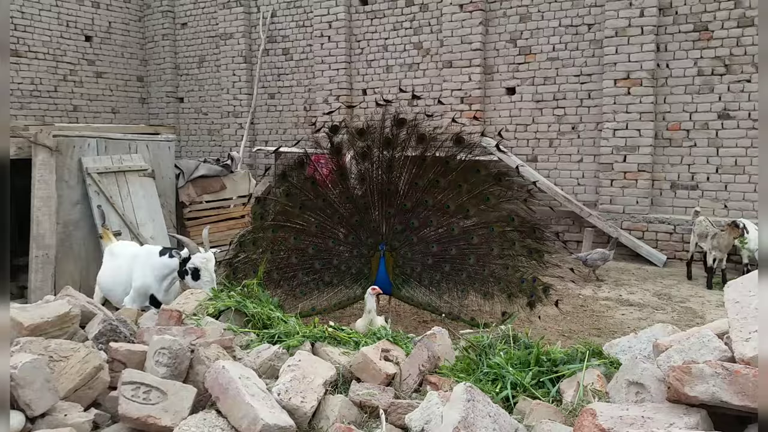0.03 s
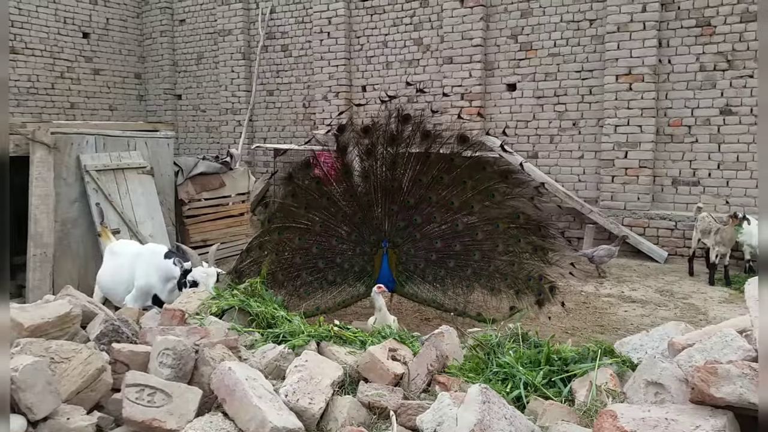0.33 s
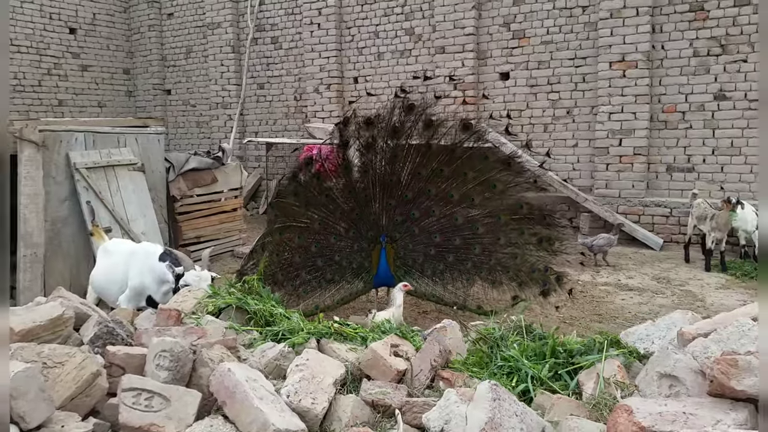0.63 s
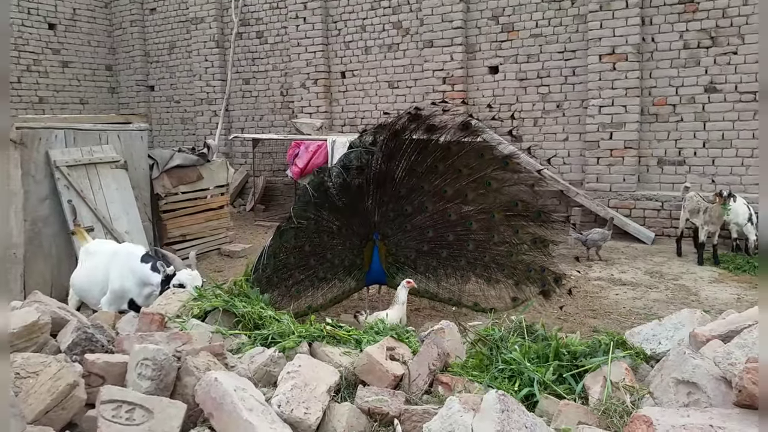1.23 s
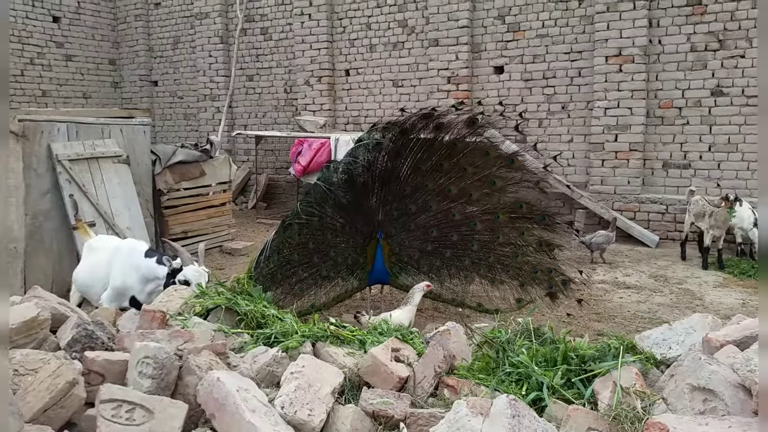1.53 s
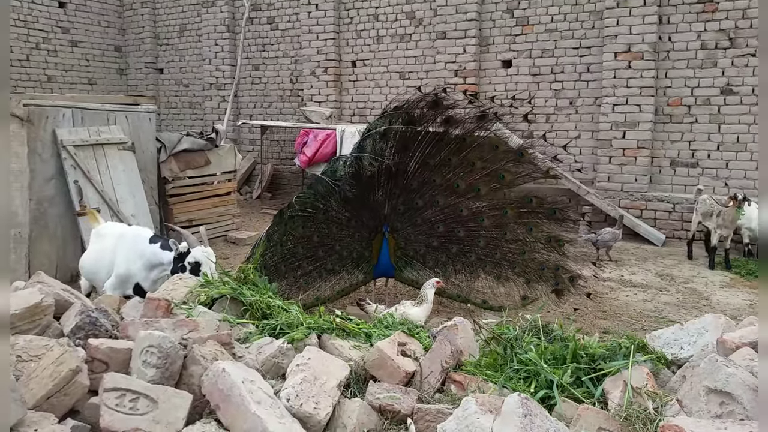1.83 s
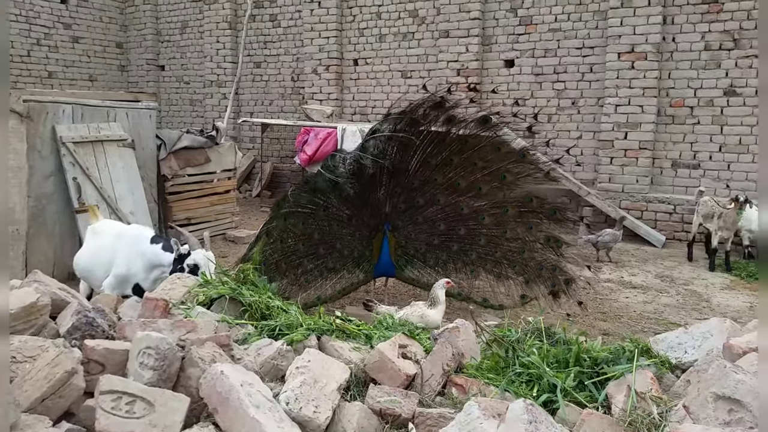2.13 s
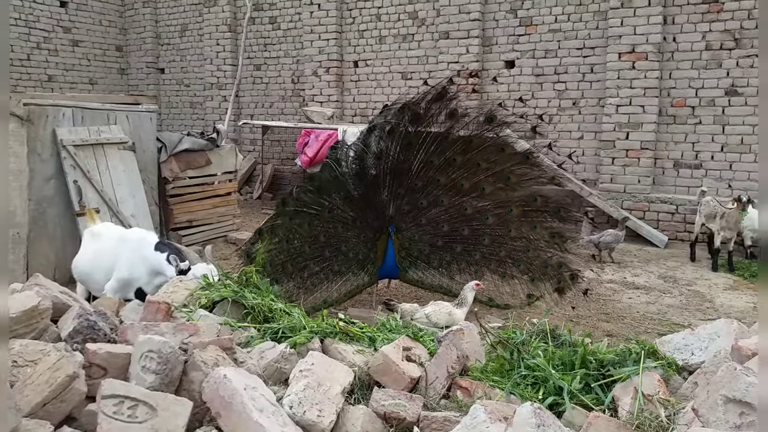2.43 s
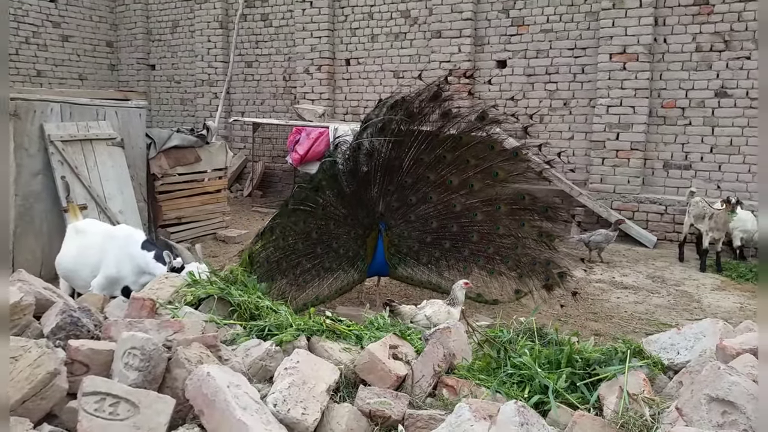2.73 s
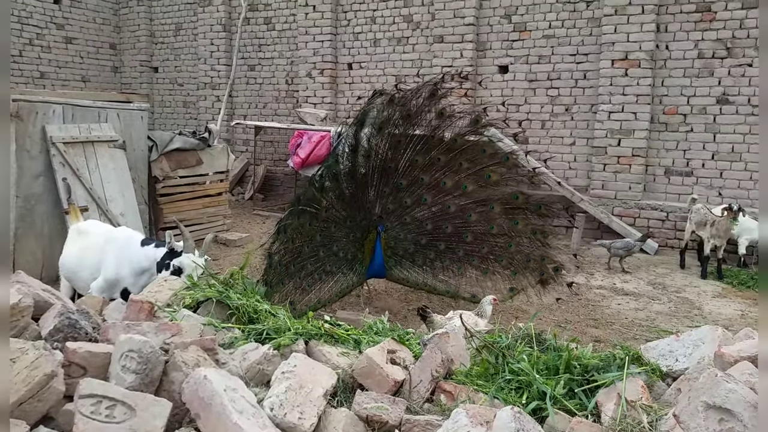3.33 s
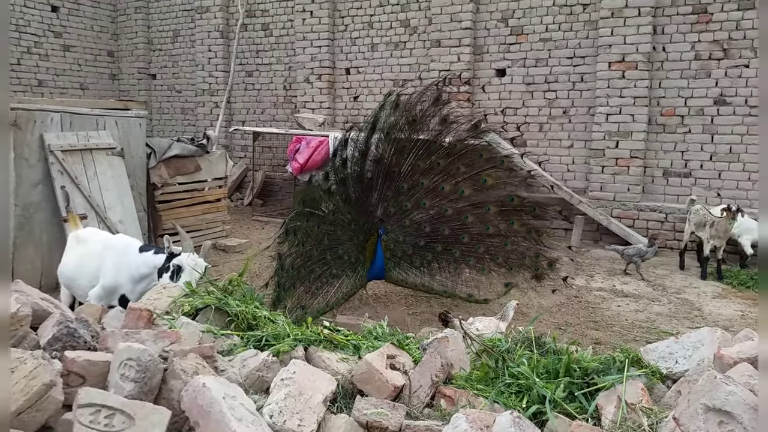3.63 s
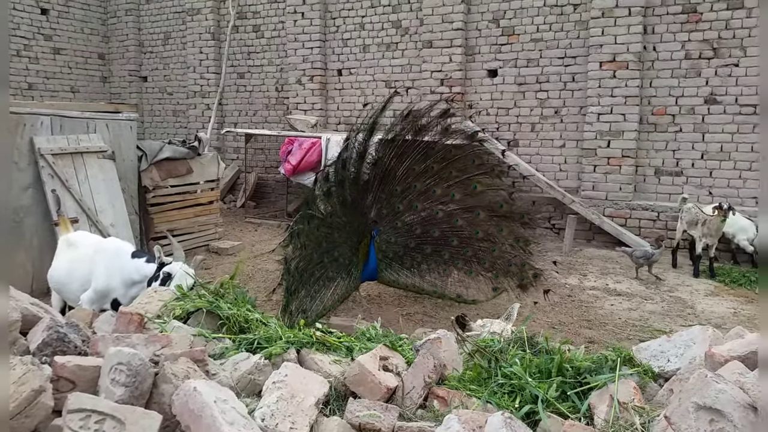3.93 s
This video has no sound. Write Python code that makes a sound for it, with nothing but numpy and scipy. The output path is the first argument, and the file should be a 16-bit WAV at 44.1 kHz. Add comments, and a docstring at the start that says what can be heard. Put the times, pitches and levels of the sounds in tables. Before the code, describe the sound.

Fine, fluttering hiss of a peacock's shaking train, with light wind and faint chirps.

```python
"""A brick-walled yard, from a hand-held camera. Low outdoor rumble comes in first, then a small bird's
faint falling chirp, which returns throughout. Dull knocks on the camera and faint low tones follow as a
peacock shivers its raised train: the feathers brush twice a shake, a fine hiss that swells near 0.9 s,
sinks, and swells again from 1.8 s. Around 3 s, in the next lull, puffs of air crowd on the left
microphone port; the train rises once more to the end."""
import sys
import numpy as np
from scipy import signal
from scipy.fft import rfft, irfft, next_fast_len
from scipy.io import wavfile
from scipy.ndimage import uniform_filter1d, map_coordinates

SR = 44100
rng = np.random.default_rng(int(sys.argv[2]) if len(sys.argv) > 2 else 0)


def bounce(signal):
    """Save signal as a 16-bit WAV file at the path given by the first command-line argument."""
    frames = np.transpose(np.atleast_2d(signal))
    limited = np.clip(frames, -1, 1)
    pcm = np.round(limited * 32767).astype(np.int16)
    wavfile.write(sys.argv[1], SR, pcm)


N = 176400

# the yard's air, all round the microphone (f/Hz, relative level/dB)
AIR_SPECTRUM = [(25, -14), (70, 2.5), (150, 0.5), (300, -10.5), (550, -13), (900, -21), (1800, -26.5),
                (3000, -29.5), (4500, -46.5), (7000, -53), (15000, -47)]
# its slow rise and fall (t/s, level/dB)
AIR_LEVEL = [(0, -52), (.4, -49.5), (.8, -47), (1.1, -51), (1.5, -52.5), (2.0, -50.5), (2.6, -49.5),
             (3.1, -50.5), (3.6, -52.5), (3.9, -48.5)]
# the microphone's own narrow hiss, mostly in the left channel (f/Hz, relative level/dB)
MIC_HISS_SPECTRUM = [(300, 3.5), (900, 0.5), (1800, -13), (2300, 6.5), (3200, -2), (4000, -16), (5500, -30),
                     (8000, -34.5), (15000, -64)]
# faint low tones in the background (t/s, length/s, f/Hz, relative level/dB)
LOW_TONES = [(0.086, 0.096, 250, -55.5), (0.473, 0.035, 292, -50), (0.58, 0.12, 257, -49),
             (0.71, 0.2, 258, -48.5), (1.298, 0.067, 255, -50.5), (1.429, 0.088, 258, -52.5),
             (1.56, 0.11, 250, -51.5)]
# decay between the brick walls (f/Hz, t60/s)
WALL_DECAY = [(200, 0.35), (3000, 0.42), (15000, 0.45)]
# the small bird, mostly on the right
# (t/s, length/s, start f/Hz, middle f/Hz, end f/Hz, level/dB, rasp/0-1, left-right/dB)
CHIRP_NOTES = [(0.104, 0.046, 2784, 2470, 2340, -61, 0.44, -3),
               (0.341, 0.05, 2057, 2250, 2360, -57.5, 0.57, -4),
               (0.684, 0.026, 4360, 4600, 4130, -59, 0.77, -2),
               (0.715, 0.007, 3250, 3420, 3340, -52, 0.5, -6),
               (0.735, .034, 2703, 3410, 2710, -51.5, 0.3, -11),
               (1.879, 0.04, 4360, 4540, 3970, -61, .7, -7),
               (1.917, 0.022, 4070, 3950, 3250, -55.5, 0.46, -8),
               (1.939, 0.029, 3250, 2690, 2650, -53.5, 0.4, -8),
               (2.477, 0.052, 4550, 4220, 3240, -62.5, 0.94, -14),
               (2.528, 0.0212, 2545, 3120, 3460, -50.5, 0.2, -13),
               (2.556, 0.0088, 3390, 2970, 2750, -47.5, .1, -8),
               (3.225, .038, 4620, 4660, 3440, -63.5, 0.6, -3),
               (3.26, 0.041, 4080, 3960, 3650, -59, 0.59, -4),
               (3.286, 0.0323, 3190, 2820, 2490, -57, 0.77, -12),
               (3.817, 0.033, 4370, 4510, 4060, -59, 0.64, -6),
               (3.857, 0.013, 4620, 4750, 4400, -65, .7, 0),
               (3.868, 0.018, 2650, 3170, 3520, -52, 0.22, -11.5),
               (3.891, 0.02, 3140, 2870, 2460, -53, .2, -3)]
# breeze right on the microphone ports (f/Hz, relative level/dB)
BREEZE_SPECTRUM = [(20, 2.5), (45, 6.5), (100, 2.5), (150, -11.5), (250, -22), (500, -43.5), (1500, -81)]
# its gusts (t/s, relative level/dB)
BREEZE_LEVEL = [(0, -49.5), (.55, -46.5), (.9, -44), (1.15, -46.5), (1.45, -54), (1.9, -49), (2.3, -52),
                (2.6, -44.5), (3.0, -40), (3.2, -56), (3.45, -43), (4, -38.5)]
# it mostly favours the left port (t/s, left-right/dB)
BREEZE_BALANCE = [(0, -5), (1.1, 1.5), (1.7, 9), (2.3, 3), (2.9, 12.5), (4, 9.5)]
# puffs on the left port (t/s, level/dB, f/Hz, half-width/s)
PORT_PUFFS = [(0.432, -31.5, 60, 0.014), (.583, -31.5, 76, 0.011), (0.982, -30.5, 57, 0.011),
              (1.12, -26, 71.5, 0.005), (1.881, -32.5, 80, 0.0049), (2.055, -35, 81.6, 0.0061),
              (2.312, -34, 63.5, 0.021), (2.788, -24.5, 99, 0.0085), (2.819, -32, 90, .016),
              (2.919, -22.5, 75, 0.013), (2.943, -21.5, 92, 0.0054), (2.984, -28, 60, .012),
              (3.017, -17.5, 70.6, 0.006), (3.056, -16.5, 91.7, 0.0049), (3.461, -30.5, 72, 0.0095),
              (3.603, -38, 61.4, 0.017), (3.771, -30, 50.3, .012), (3.795, -15.5, 79.5, 0.0051)]
# knocks on the camera body, close to the microphone
# (t/s, level/dB, ring f/Hz, ring t60/s, relative click level/dB, left-right/dB)
BODY_KNOCKS = [(0.296, -36.5, 435, 0.011, -16, 13), (0.3254, -36, 188, 0.026, -24, 8),
               (0.3262, -31.5, 507, 0.01, -26, 11.5), (0.7996, -22.5, 378, 0.013, -8.5, 2.5),
               (0.811, -34, 276, 0.0072, -21, 25), (0.837, -28, 261, 0.0092, -16, 6),
               (1.313, -26.5, 402, 0.013, -6.5, 2.5), (1.441, -34, 262, 0.019, -24, 7),
               (1.475, -56, 400, .01, 9, 0), (1.642, -28.5, 470, .013, -41, 14.5),
               (2.5267, -28.5, 493, 0.011, -23, 14.5)]
# how hard the peacock shivers (t/s, relative level/dB)
SHIVER_EFFORT = [(0.04, -71), (0.07, -66.5), (0.15, -56.5), (0.4, -59), (0.6, -46.5), (0.86, -42.5),
                 (1.0, -45.5), (1.12, -56.5), (1.22, -54.5), (1.35, -66.5), (1.61, -73), (1.8, -51),
                 (1.94, -43.5), (2.16, -49), (2.6, -45), (2.85, -57), (3.18, -70), (3.25, -58),
                 (3.37, -54.5), (3.56, -63), (3.72, -47.5), (4.0, -45)]
# how fast the train shakes (t/s, f/Hz)
SHAKE_RATE = [(0, 25.6), (.85, 25.8), (1.27, 25.0), (2.2, 25.6), (3.2, 25.0), (3.6, 26.0), (4, 26.4)]
# strength of the back stroke (t/s, ratio to the forward stroke)
BACK_STROKE_SHARE = [(0, .5), (.85, .6), (1.4, .4), (2.2, .2), (2.9, .35), (3.9, .65)]
# barbs brushing (f/Hz, relative level/dB)
BARB_SPECTRUM = [(6000, -32), (8000, -34), (9500, -32.5), (10500, -22), (11500, -12.5), (12800, -3.5),
                 (14200, 2.5), (15700, 3)]
# the softer rustle of the vanes (f/Hz, relative level/dB)
VANE_SPECTRUM = [(250, -2), (600, 0), (1200, 2.5), (1800, -2), (3000, 5), (4100, -2.5), (4800, -7),
                 (5400, -10.5), (6300, -22), (8000, -29.5), (11000, -61)]


def amp(db):
    """Decibels to gain."""
    return 10 ** (np.asarray(db) / 20)


def unit(x):
    """Scale to rms 1."""
    return x / np.sqrt(np.mean(x ** 2) + 1e-20)


def along(points, hz):
    """(f/Hz, value) points read on a log axis."""
    f, v = np.transpose(points)
    return np.interp(np.log(hz + 1), np.log(f + 1), v)


def curve(rows):
    """(t/s, value) points, one value per sample."""
    return np.interp(np.arange(N) / SR, *np.transpose(rows))


def wobble(rate):
    """A smooth random curve, rate knots a second."""
    return map_coordinates(rng.standard_normal(int(N * rate / SR) + 4), [np.arange(N) * rate / SR])


def noise():
    """Two unrelated white noises."""
    return rng.standard_normal((2, N))


def filtered(x, response):
    """x through a frequency response."""
    m = next_fast_len(N + SR // 2)
    return irfft(rfft(x, m) * response(np.fft.rfftfreq(m, 1 / SR)), m)[..., :N]


def coloured(x, spectrum):
    """x shaped by a spectrum, at rms 1."""
    return unit(filtered(x, lambda hz: amp(along(spectrum, hz))))


def dull(x, top_hz):
    """Roll off the treble."""
    return signal.sosfilt(signal.butter(4, top_hz, fs=SR, output="sos"), x)


def pan(lean_db):
    """Left and right gains; positive leans left."""
    return amp(np.array([[lean_db], [-lean_db]]) / 2)


def spread(pair, alike):
    """Two unrelated signals mixed to a stereo pair of given correlation."""
    angle = np.arccos(alike) / 2
    return np.cos(angle) * pair[0] + np.sin(angle) * pair[1] * np.array([[1], [-1]])


def mic_hiss():
    """The microphone's own narrow hiss, mostly in the left channel."""
    return coloured(noise(), MIC_HISS_SPECTRUM) * amp(-56.5 + 1.8 * wobble(4.9)) * amp([[0], [-16]])


def yard_air():
    """Low outdoor air across both channels."""
    air = coloured(spread(noise(), alike=0.46), AIR_SPECTRUM)
    return air * amp(curve(AIR_LEVEL) + 0.73 * wobble(14)) * pan(lean_db=0.5)


def low_tones():
    """Faint wavering tones come and go, just left of centre."""
    t, out = np.arange(N) / SR, np.zeros(N)
    waver = 1 + 0.046 * wobble(39.9)
    for start, length, hz, db in LOW_TONES:
        swell = np.sin(np.pi * np.clip((t - start) / length, 0, 1))
        out += amp(db) * swell * np.sin(2 * np.pi * hz * np.cumsum(waver) / SR)
    return out * amp([[4], [2]])


def brick_walls(x):
    """The walls' diffuse answer to a mono sound out in the yard."""
    hz, t, bins = signal.stft(rng.standard_normal((2, SR // 2)), SR, nperseg=256)
    decay = amp(-60 * t / along(WALL_DECAY, hz)[:, None])
    tail = signal.istft(bins * decay, SR, nperseg=256)[1]
    return signal.fftconvolve(x[None], tail / np.linalg.norm(tail[0]), axes=1)[:, :N]


def small_bird(rasp_hz=546, walls_db=-5):
    """Quick runs of gliding notes, raspy at the top and purer as they step down, blurred by the walls."""
    out, flutter = np.zeros((2, N + SR)), wobble(900)
    for start, length, start_hz, mid_hz, end_hz, db, rasp, lean_db in CHIRP_NOTES:
        progress, at = np.linspace(0, 1, int(length * SR)), round(start * SR)
        glide = np.interp(progress, [0, .5, 1], [start_hz, mid_hz, end_hz])
        hz = glide + rasp * rasp_hz * np.roll(flutter, -at)[:len(glide)]
        swell = np.sqrt(np.abs(np.sin(np.pi * progress)))
        note = np.sin(2 * np.pi * np.cumsum(hz) / SR) * swell
        out[:, at:][:, :len(note)] += amp(db) * note * pan(lean_db)
    return out[:, :N] + amp(walls_db) * brick_walls(out.mean(axis=0)[:N])


def breeze():
    """Lumpy rumble on each microphone port, and single puffs that push the left one to and fro."""
    t = np.arange(N) / SR
    lumps = amp(2.5 * np.array([wobble(16), wobble(25)]))
    port_db = curve(BREEZE_LEVEL) - 1 + curve(BREEZE_BALANCE) * np.array([[.5], [-.5]])
    rumble = unit(coloured(noise(), BREEZE_SPECTRUM) * lumps) * amp(port_db)
    puffs = sum(amp(db) * np.sin(2 * np.pi * hz * (t - centre)) / (1 + ((t - centre) / width) ** 4)
                for centre, db, hz, width in PORT_PUFFS)
    return rumble + puffs * amp([[0], [-25]])


def camera_knocks(thud_hz=131, thud_t60_s=0.056, click_t60_s=0.03, right_lead_s=0.00067):
    """Each knock is a dull click, a dead ring of the case and a low thud; the right port feels it first."""
    out, t = np.zeros((2, N + SR)), np.arange(SR // 8) / SR
    thud = np.sin(2 * np.pi * thud_hz * t) * amp(-5.5 - 60 * t / thud_t60_s)
    attack = 1 - np.exp(-t / 0.00079)
    for start, db, hz, t60, click_db, lean_db in BODY_KNOCKS:
        ring = 2 * np.sin(2 * np.pi * hz * t) * attack * amp(-60 * t / t60)
        burst = spread(rng.standard_normal((2, len(t))), alike=0.47)
        click = dull(burst * amp(click_db + 5.5 - 60 * t / click_t60_s), top_hz=1850)
        knock = amp(db) * (click - dull(ring + thud, top_hz=694)) * pan(lean_db)
        for port, arrival in enumerate([start, start - right_lead_s]):
            out[port, round(arrival * SR):][:len(t)] += knock[port]
    return out[:, :N]


def feather_catches(x, depth_db=0.96):
    """Brief patches of random gain across the spectrum, as single feathers catch and ring."""
    bins = signal.stft(x, nperseg=256)[2]
    patches = rng.standard_normal(bins.shape[1:])
    for axis in (0, 1):
        patches = uniform_filter1d(patches, size=5, axis=axis)
    return signal.istft(bins * amp(depth_db * unit(patches)), nperseg=256)[1][:, :N]


def shake_strokes(rise_s=.005, fall_s=.0095):
    """The brushing surges twice a shake: a forward stroke, then a weaker one back."""
    shake_hz = curve(SHAKE_RATE) + .25 * wobble(8)
    shakes = np.cumsum(shake_hz) / SR
    age = np.array([shakes, shakes + .5]) % 1 / shake_hz
    forward, back = np.exp(-age / fall_s) * (1 - np.exp(-(age / rise_s) ** 2))
    strength = amp(7 + 1.9 * wobble(50))
    return unit(1 + strength * (forward + curve(BACK_STROKE_SHARE) * back))


def peacock_train(contacts_per_s=5000, contact_share=0.24, quill_hz=4700, quill_width_hz=220):
    """Countless tiny feather contacts crowd into each stroke; vanes rustle and quills ring beneath."""
    brushing = shake_strokes()
    contacts = unit(noise() * (rng.random((2, N)) < contacts_per_s / SR))
    friction = np.sqrt(contact_share) * contacts + np.sqrt(1 - contact_share) * noise()
    grains = feather_catches(spread(friction, alike=.9))
    effort_db = curve(SHIVER_EFFORT)
    barbs = coloured(grains * brushing, BARB_SPECTRUM) * amp(effort_db + 3.5 + .9 * wobble(22.37))
    rustle = feather_catches(spread(noise(), alike=0.052)) * brushing ** 0.56  # a shallower pulse
    vanes = coloured(rustle, VANE_SPECTRUM) * amp(-60) * pan(lean_db=13)
    resonance = lambda hz: 1 / (1 + 2j * (hz - quill_hz) / quill_width_hz) ** 2
    quills = unit(filtered(noise(), resonance)) * amp(-77)
    gentler_swell = amp(0.66 * (effort_db - effort_db.max()))
    return barbs + (vanes + quills) * gentler_swell


def scene():
    """The peacock and the yard around it, as the microphone picks them up."""
    return peacock_train() + yard_air() + mic_hiss() + breeze() + camera_knocks() + small_bird() + low_tones()


def record(dry):
    """The camera fades in and keeps nothing above its band limit."""
    fade_in, top_hz = curve([(.03, 0), (.055, 0.96)]), 15850
    return filtered(dry * fade_in, lambda hz: hz < top_hz)


dry = scene()
out = record(dry)
bounce(out)
```